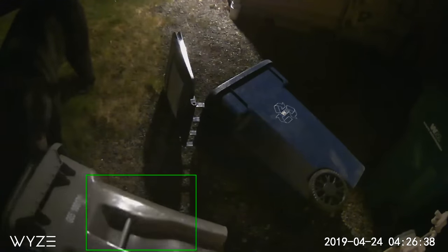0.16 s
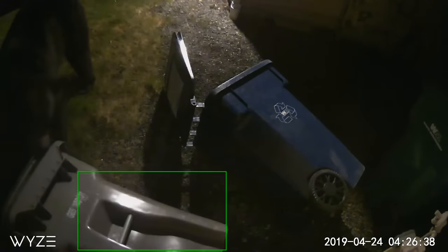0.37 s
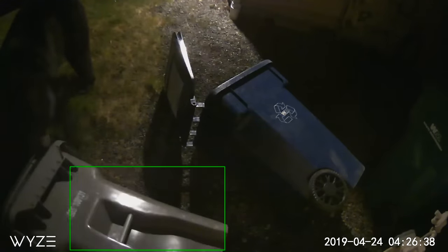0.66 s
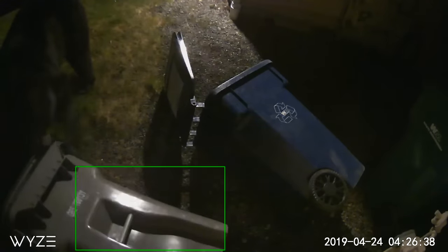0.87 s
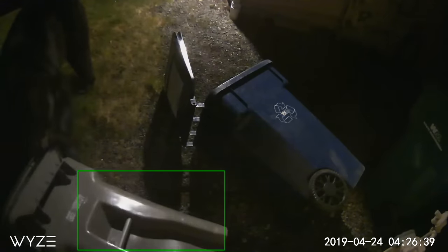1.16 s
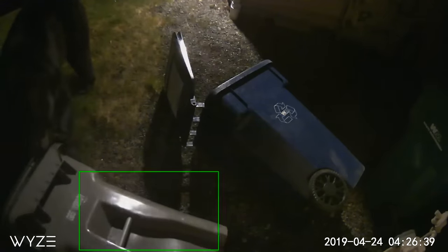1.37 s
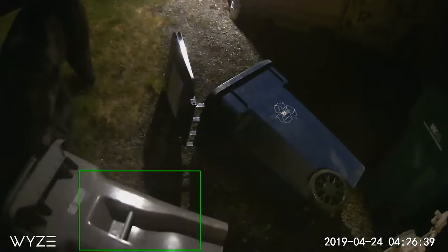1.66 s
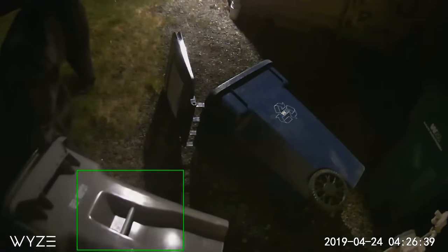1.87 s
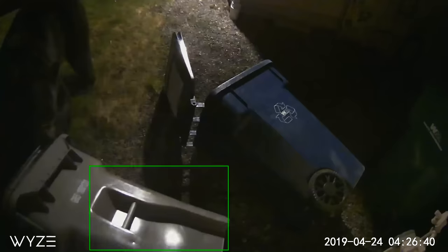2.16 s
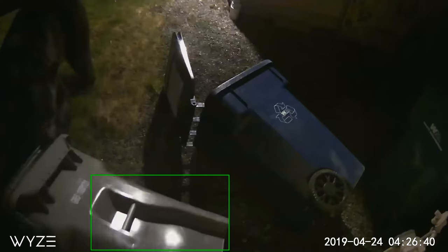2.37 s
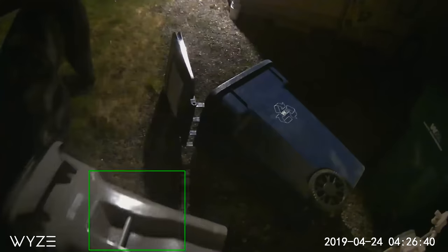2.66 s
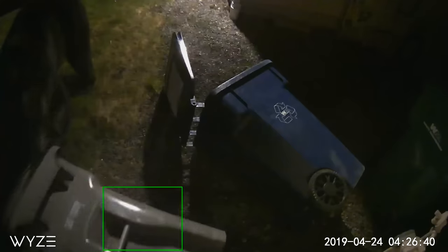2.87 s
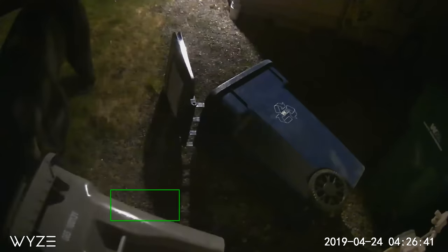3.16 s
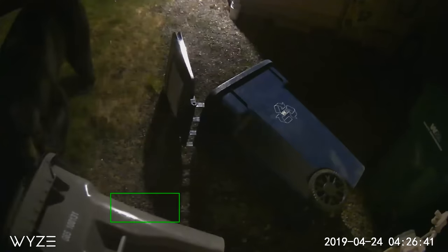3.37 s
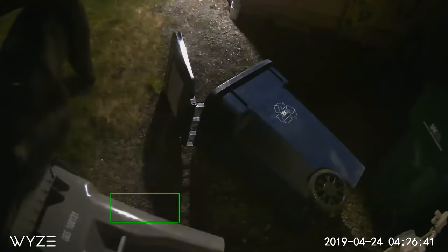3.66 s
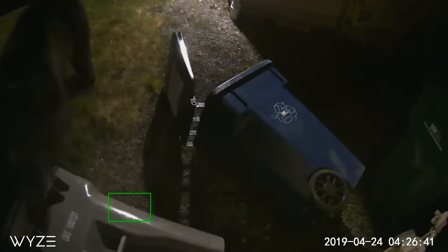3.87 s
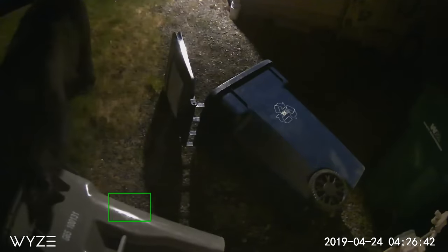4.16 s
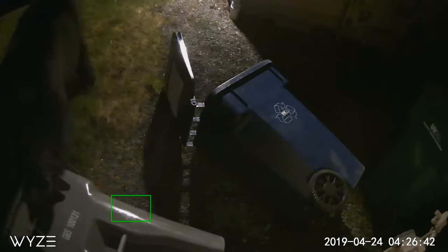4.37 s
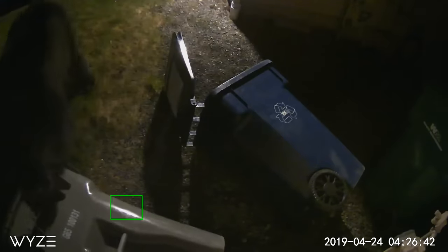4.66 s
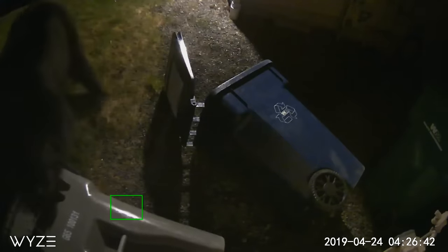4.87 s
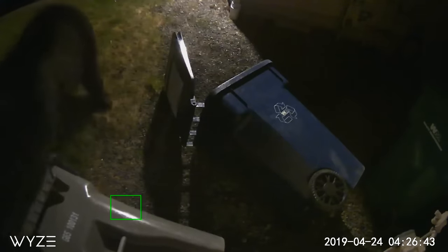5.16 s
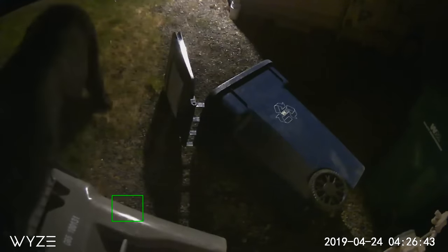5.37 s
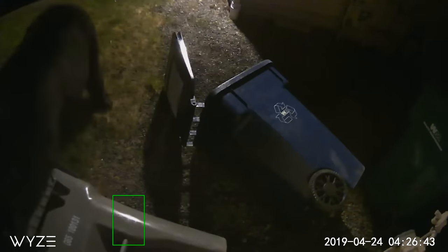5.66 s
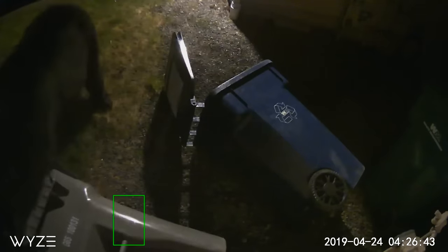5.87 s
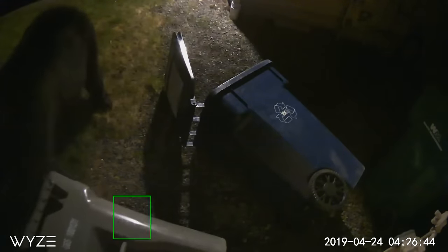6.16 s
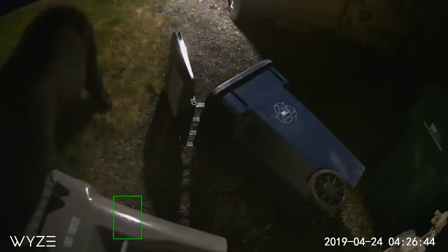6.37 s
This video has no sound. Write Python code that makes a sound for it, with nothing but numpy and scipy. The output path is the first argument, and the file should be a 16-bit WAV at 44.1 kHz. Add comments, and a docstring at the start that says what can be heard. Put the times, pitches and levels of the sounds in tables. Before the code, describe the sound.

Dull, hollow thumps and stuttering scrapes come from a plastic garbage bin as a bear paws and drags it, heard through a gritty security camera.

```python
"""In faint night air, a bear shoves and paws a plastic wheeled bin under a security camera.
From the first moment, knocks boom the hollow body, ring the walls and clack the lid; loud shoves flex it.
Between knocks the bin scrapes in sticks and slips, and from about 1 s rubbish crinkles now and then.
One long drag builds from 4.9 s to a peak at 5.6 s; a few bright clacks and short slides end the scene.
All along the camera makes it dull and mono, ticks, and holds 8000 samples a second for a gritty treble."""
import sys
import numpy as np
from scipy import signal
from scipy.fft import rfft, irfft
from scipy.io import wavfile
from scipy.ndimage import uniform_filter1d

SR = 44100
rng = np.random.default_rng(int(sys.argv[2]) if len(sys.argv) > 2 else 0)


def dump_mix(stems):
    """Bounce the given channels to the path in sys.argv[1] as a 16-bit WAV at rate SR."""
    frames = np.atleast_2d(stems).T  # one column per channel
    limited = np.clip(frames, -1, 1)  # hard clip at full scale
    pcm = np.round(limited * 32767).astype(np.int16)
    wavfile.write(sys.argv[1], SR, pcm)


N = 287091
TIME_S = np.arange(N) / SR
AGE_S = TIME_S[:int(0.5 * SR)]  # time axis of one contact


def undb(db):
    """Decibels to gain."""
    return 10 ** (np.asarray(db) / 20)


def unit(x):
    """Scale to unit energy."""
    return x / np.sqrt(np.sum(x ** 2) + 1e-18)


def level(x, rms_db):
    """Scale to an rms level."""
    return unit(x) * np.sqrt(len(x)) * undb(rms_db)


def band(x, lo_hz, hi_hz, order=3):
    """Causal band-pass."""
    return signal.sosfilt(signal.butter(order, [lo_hz, hi_hz], "band", fs=SR, output="sos"), x)


def fade(rise_s, t60_s):
    """Quick swell, exponential decay."""
    return (1 - np.exp(-AGE_S / rise_s)) * np.exp(-np.log(1000) * AGE_S / t60_s)


def burst(lo_hz, hi_hz, rise_s, t60_s, order=3):
    """Decaying band noise of unit energy."""
    return unit(band(rng.standard_normal(len(AGE_S)), lo_hz, hi_hz, order) * fade(rise_s, t60_s))


def add(track, start_s, x):
    """Mix x into the track."""
    i = max(int(start_s * SR), 0)
    track[i:i + len(x)] += x[:max(N - i, 0)]


# Air spectrum: freq_hz, relative_density_db
AIR_SPECTRUM = [(25, -6.5), (70, -18.5), (130, -4.5), (300, -30), (600, -17), (1000, -44), (1500, -31.5),
                (3800, -41.5)]
def night_air(level_db=-67.5):
    """Faint, even outdoor air."""
    freq_hz, density_db = np.transpose(AIR_SPECTRUM)
    bins_hz = np.fft.rfftfreq(N, 1 / SR)
    colour = undb(np.interp(np.log(bins_hz + 1), np.log(freq_hz), density_db))
    return level(irfft(rfft(rng.standard_normal(N)) * colour, N), level_db)


# Bin resonances: pitch_hz, relative_db
BIN_MODES = [(67, 4), (75, -6), (88, 4), (103, 4), (115, -5), (126, -3), (148, -2), (193, -5), (227, -11.5),
             (275, -3.5), (300, -8), (336, 0), (384, -6), (425, -8.5), (472, -6), (565, -8.5), (616, -7),
             (706, -10), (824, -9.5), (917, -15.5), (1006, -7.5), (1112, -16), (1258, -23.5)]
# Body, walls, lid: lo_hz, hi_hz, rise_s, ring_t60_s, clatter_t60_s, clatter_db, tail_t60_s, tail_db,
# scrape_share_db
BIN_PARTS = [(55.3, 199, 0.0082, 0.31, 0.25, -15, 0.32, -3, -3.5),
             (206, 650, 0.00026, .12, 0.036, -6, 0.22, 0.5, -1.5),
             (645, 1237, 0.00055, 0.06, 0.052, -3.5, 0.19, -9, 1.5)]
def struck_part(part, softness_s, spot_hz=0, spot_db=3.0, detune=0.012):
    """One part struck once: its modes, the clatter of loose contents and a tail off the house wall."""
    lo_hz, hi_hz, rise_s, ring_t60_s, clatter_t60_s, clatter_db, tail_t60_s, tail_db, _ = part
    pitch_hz, mode_db = np.transpose([mode for mode in BIN_MODES if lo_hz <= mode[0] < hi_hz])
    # each contact reweights the modes; the load bends their pitch
    polarity, spread, bend = rng.standard_normal((len(BIN_MODES), 3))[:len(pitch_hz)].T
    weights = undb(mode_db) * np.sign(polarity) * np.exp(spread)
    waves = np.sin(np.outer(2 * np.pi * pitch_hz * (1 + detune * bend), AGE_S).astype(np.float32))
    rise_s += abs(softness_s)
    ring = unit(weights @ waves * fade(rise_s, ring_t60_s))
    if lo_hz <= spot_hz < hi_hz:  # the panel under the paw sings, longer when low
        spot_t60_s = 0.12 * np.sqrt(400 / spot_hz)
        spot = np.sin(2 * np.pi * spot_hz * AGE_S) * fade(rise_s, spot_t60_s)
        ring = unit(ring + undb(spot_db) * unit(spot))
    clatter = undb(clatter_db) * burst(lo_hz, hi_hz, rise_s, clatter_t60_s)
    tail = undb(tail_db) * burst(lo_hz, hi_hz, 0.0033, tail_t60_s)
    return unit(ring + clatter + tail)


def blow_shares(brightness_db, spot_hz, struck_db=4.0):
    """Gains of body, walls and lid: hard contacts favour the lid, and the struck part gets more."""
    is_struck = np.array([lo_hz <= spot_hz < hi_hz for lo_hz, hi_hz, *_ in BIN_PARTS])
    tilt_db = np.array([-brightness_db / 2, 0, brightness_db / 2])
    return unit(undb(tilt_db + struck_db * is_struck))


# Blows on the bin: start_s, strength_db, brightness_db, spot_hz, softness_s
BLOWS = [(0.051, -22, 1, 296, 0.0022), (0.1, -21.5, -2.5, 243, 0.0006), (0.195, -14.5, -8.5, 936, 0.00044),
         (0.236, -22.5, -4, 700, 0.001), (0.269, -23, -6, 362, 0.0009), (0.361, -20.5, -6, 821, 0.021),
         (0.462, -26.5, -2, 873, 0.0082), (0.533, -16, -5.5, 1004, 0.0028), (0.652, -34.5, 6.5, 934, .001),
         (0.94, -21.5, -1, 737, 0.0041), (0.972, -19, 1, 170, 0.00079), (1.011, -20, -17, 101, 0.00079),
         (1.331, -37, -13.5, 149.7, 0.0044), (1.536, -28, -2, 927, 0.00021),
         (1.745, -26.5, -13.5, 748, 0.00046), (1.785, -25.5, -6, 169, .0035),
         (1.822, -21.5, 4.5, 93.6, 0.006), (2.063, -25.5, -2.5, 967, 0.015),
         (2.113, -18.5, -3, 392, 0.00035), (2.199, -29, -2.5, 177, 0.0011), (2.461, -32, 4.5, 1023, 0.0021),
         (2.5, -33, -44, 81, 0.0091), (2.555, -31, -3.5, 355, 0.006), (2.641, -27.5, -6.5, 1022, 0.00087),
         (2.693, -29, -4, 889, 0.00058), (2.769, -27, -1, 789, .003), (2.809, -21.5, -5, 315, 0.00055),
         (2.86, -16.5, -5, 591, 0.016), (2.875, -21, 1, 434, .0008), (2.904, -19.5, -5.5, 730, 0.00065),
         (2.995, -34.5, -2, 1095, 0.0045), (3.033, -36, -4.5, 1044, 0.0034),
         (3.201, -42.5, -43.5, 81, 0.011), (3.32, -37.5, -9.5, 1002, .002), (3.359, -38, -34, 74, 0.0056),
         (3.512, -41, -25, 63, 0.0055), (3.669, -27.5, -6.5, 286, 0.00089), (3.712, -13.5, 1, 1063, 0.0012),
         (3.74, -17.5, -4, 155.2, 0.00051), (4.013, -15.5, -12.5, 205, 0.00024),
         (4.161, -22.5, -10, 186.7, 0.0025), (4.306, -30, -14.5, 703, 0.0011), (4.322, -28, 5, 362, .0055),
         (4.654, -34.5, 20, 918, 0.011), (5.092, -34.5, -0.5, 315, 0.0022),
         (5.271, -17.5, -14, 200.1, 0.0025), (5.305, -22, -13, 199.7, 0.0013),
         (5.372, -20.5, 37, 1040, 0.0093), (5.426, -25.5, -7, 976, 0.002),
         (5.582, -16.5, -0.5, 1070, 0.00047), (5.607, -16, 3, 1000, .001), (5.625, -15, -5, 990, 0.00068),
         (5.664, -13, -8, 73.6, 0.00092), (5.688, -18.5, 26, 749, .0008), (5.73, -22.5, 28, 1010, 0.00047),
         (5.76, -14.5, -2.5, 426, 0.0021), (5.924, -23, 33, 962, 0.00042), (6.222, -34.5, 43, 1050, .005),
         (6.294, -23, 15.5, 417, 0.00067), (6.393, -40.5, 24, 563, 0.0034), (6.493, -45.5, 37, 985, .003)]
def knocks(blow_s=0.024, knock_hiss_db=-6.0, rebound_s=0.034, rebound_db=(-9.5, -15, -15.5)):
    """A blow rings body, walls and lid; a faint treble hiss follows; the bin rocks back, duller."""
    out = np.zeros(N)
    for start_s, strength_db, brightness_db, spot_hz, softness_s in BLOWS:
        gains = np.sqrt(blow_s * SR) * undb(strength_db) * blow_shares(brightness_db, spot_hz)
        blow = sum(gain * struck_part(part, softness_s, spot_hz) for gain, part in zip(gains, BIN_PARTS))
        knock_hiss = burst(1450, 3000, rise_s=abs(softness_s) + 1e-6, t60_s=0.17, order=2)
        add(out, start_s, blow + gains[-1] * undb(knock_hiss_db) * knock_hiss)
        rebound_gains = gains * undb(rebound_db)
        rebound = sum(gain * struck_part(part, softness_s) for gain, part in zip(rebound_gains, BIN_PARTS))
        add(out, start_s + rebound_s, rebound)
    return out


def flexing(bin_sound, relative_db=-16.0, window_s=0.06):
    """The bin flexes slowly under loud shoves: a rumble that follows its bass."""
    bass_power = uniform_filter1d(band(bin_sound, 76, 180) ** 2, int(window_s * SR))
    rumble = band(rng.standard_normal(N), 29, 60, order=2)
    return np.sqrt(np.abs(bass_power)) * level(rumble, relative_db)


def seam_ticks(x, first_s=0.0529, block_s=0.12, jump_db=6.5, scatter_db=7, relax_s=0.00069, memory_s=0.016):
    """The camera's blocks join badly: at each seam the wave jumps, more when loud, and slides back."""
    out = np.zeros(N)
    for seam_s in np.arange(first_s, N / SR, block_s):
        side, size = rng.standard_normal(2)
        recent_rms = np.std(x[max(int((seam_s - memory_s) * SR), 0):int(seam_s * SR)])
        jump = np.sign(side) * recent_rms * undb(jump_db + scatter_db * min(size, 1))
        add(out, seam_s, jump * np.exp(-AGE_S / relax_s))
    return out


# Short slides: peak_s, force_db, build_s
SHORT_SLIDES = [(0.322, -35.5, 0.072), (.6, -40.5, 0.39), (0.978, -26, 0.032), (1.16, -55.5, .1),
                (1.3, -56.5, 0.28), (1.548, -36, 0.15), (1.839, -36, 0.18), (2.138, -33, 0.072),
                (2.279, -51, 0.16), (2.619, -43, 0.14), (2.9, -33, 0.34), (3.61, -48, 0.047),
                (3.75, -35.5, 0.12), (4.0, -31.5, 0.087), (4.451, -46, 0.13), (4.621, -53.5, 0.9),
                (4.789, -48.5, 0.16), (5.921, -33, 0.26), (6.009, -44.5, 0.19), (6.28, -48.5, 0.34)]
# Long drag contour: time_s, relative_force_db
LONG_DRAG = [(4.88, -59), (5.112, -40.5), (5.23, -34.5), (5.386, -23), (5.49, -27), (5.608, -17),
             (5.776, -27.5), (5.836, -50), (5.85, -58)]
def rubbing_force(build_db=26, stop_db_per_s=231, drag_trim_db=-3.5):
    """How hard the bin rubs the ground: slides that build and stop, and one long drag."""
    slides_db = [force_db + np.minimum(build_db * (TIME_S - peak_s) / build_s,
                                       stop_db_per_s * (peak_s - TIME_S))
                 for peak_s, force_db, build_s in SHORT_SLIDES]
    times_s, contour_db = np.transpose(LONG_DRAG)
    outside_s = np.abs(TIME_S - np.clip(TIME_S, times_s[0], times_s[-1]))
    drag_db = np.interp(TIME_S, times_s, contour_db) + drag_trim_db - stop_db_per_s * outside_s
    return undb(np.max(slides_db + [drag_db], axis=0))


def scraping(contacts=3, slips_per_s=110, scatter_db=3.5, grit_db=-3):
    """Contact points stick and slip at random; each slip rings the bin and grinds a little grit."""
    force = rubbing_force()
    out = np.zeros(N)
    for _ in range(contacts):
        is_slip = rng.random(N) < slips_per_s / SR
        sizes = undb(scatter_db * np.minimum(rng.exponential(size=N), 3))
        signs = np.sign(rng.standard_normal(N))
        slips = level(is_slip * sizes * signs, 0) * force
        grit = undb(grit_db) * burst(1550, 3000, rise_s=0.00061, t60_s=0.01, order=2)
        ring = sum(undb(part[-1]) * struck_part(part, softness_s=0.00063) for part in BIN_PARTS)
        out += signal.fftconvolve(slips, ring + grit)[:N]
    return out / np.sqrt(contacts)


# Rubbish crinkles: start_s, length_s, level_db
CRINKLES = [(0.936, 0.078, -51.5), (1.515, 0.031, -60), (4.375, 0.4, -73), (4.721, 0.12, -61.5),
            (4.995, 0.35, -66.5), (5.93, 0.0047, -51)]
def rubbish():
    """Rubbish crinkles in short swells of fine crackle."""
    out = np.zeros(N)
    for start_s, length_s, level_db in CRINKLES:
        crackle = band(rng.standard_normal(len(AGE_S)) ** 3, 1600, 3100)[:int(length_s * SR)]
        add(out, start_s, level(crackle * np.hanning(len(crackle)), level_db))
    return out


def scene(dull_hz=1354, bypass_db=-23.5):
    """The dull bin with a trace of treble, its flexing, the rubbish and the night air."""
    bin_sound = knocks() + scraping()
    lowpass = signal.butter(9, dull_hz, fs=SR, output="sos")
    dull_bin = signal.sosfilt(lowpass, bin_sound) + undb(bypass_db) * bin_sound
    return np.tile(dull_bin + flexing(bin_sound) + rubbish() + night_air(), (2, 1))


def record(dry, hiss_db=-77, ceiling=0.54, hold_hz=8000, droop_hz=12300, top_hz=15800):
    """Mono camera: hiss, ticks, soft overload and held samples whose treble droops."""
    x = dry.mean(axis=0) + level(band(rng.standard_normal(N), 100, 3000), hiss_db)
    x = ceiling * np.tanh((x + seam_ticks(x)) / ceiling)
    held_s = np.floor(TIME_S * hold_hz) / hold_hz
    x = np.interp(held_s, TIME_S, x)  # steps mirror the sound around multiples of hold_hz
    x = signal.sosfilt(signal.butter(3, droop_hz, fs=SR, output="sos"), x)
    x = signal.sosfilt(signal.ellip(8, 0.2, 70, top_hz, fs=SR, output="sos"), x)
    return np.tile(x, (2, 1))


dry = scene()
out = record(dry)
dump_mix(out)
```